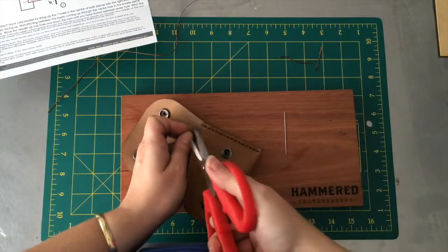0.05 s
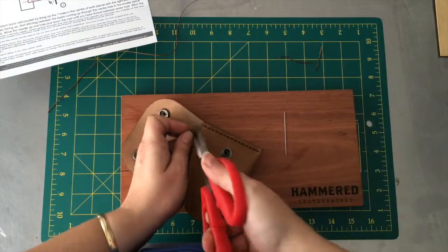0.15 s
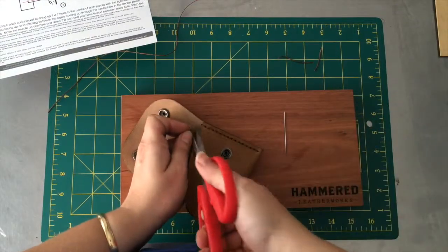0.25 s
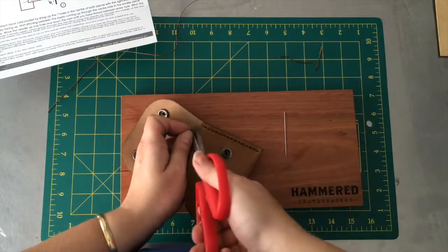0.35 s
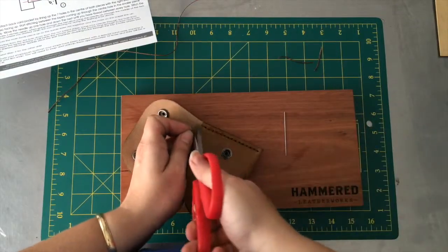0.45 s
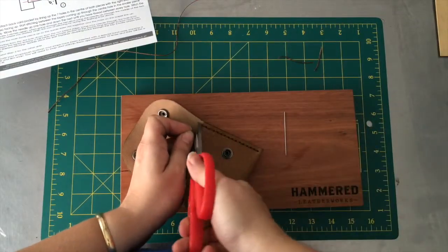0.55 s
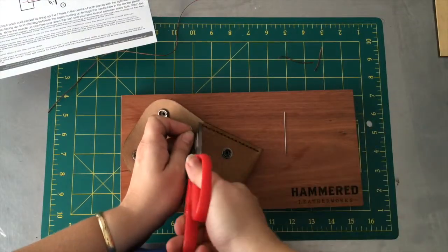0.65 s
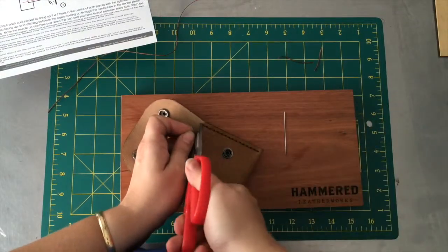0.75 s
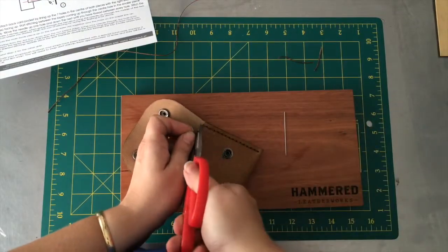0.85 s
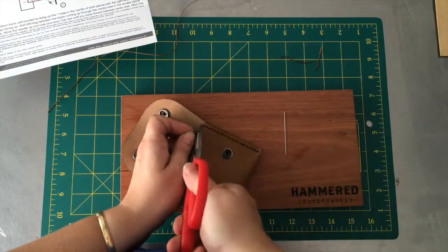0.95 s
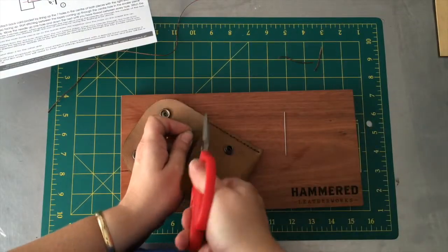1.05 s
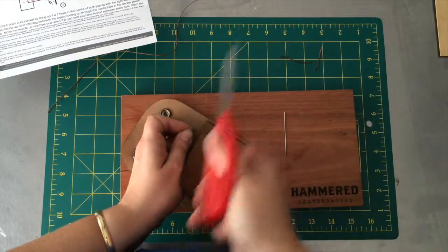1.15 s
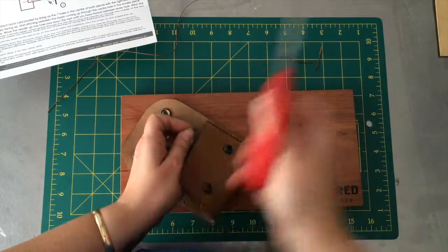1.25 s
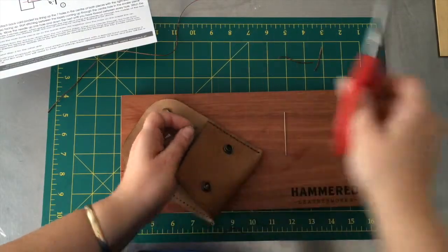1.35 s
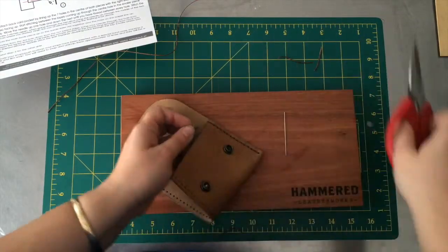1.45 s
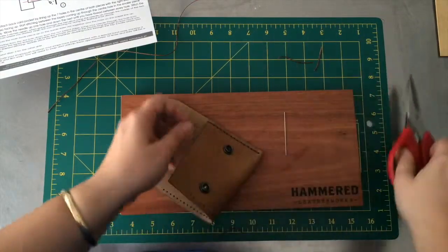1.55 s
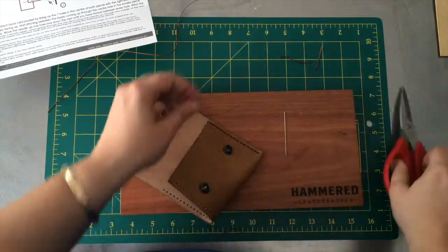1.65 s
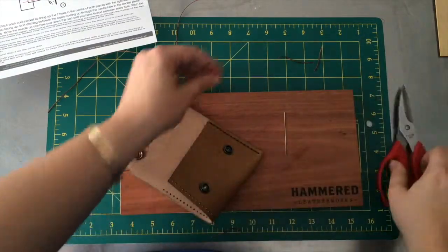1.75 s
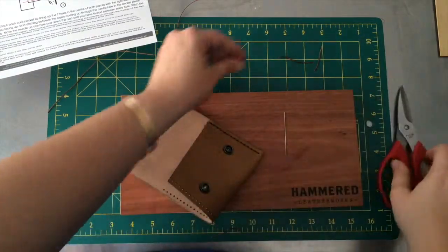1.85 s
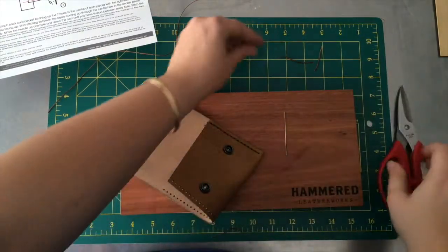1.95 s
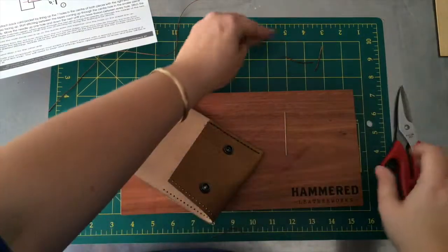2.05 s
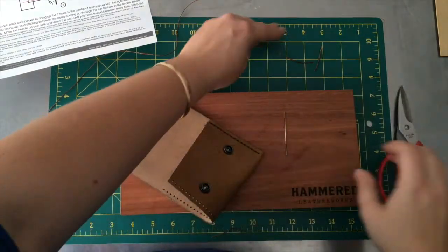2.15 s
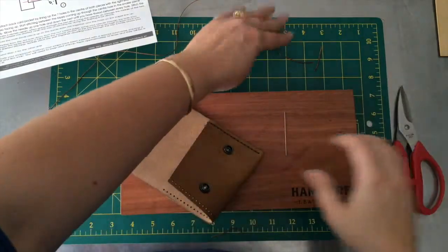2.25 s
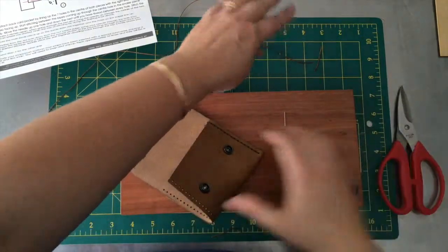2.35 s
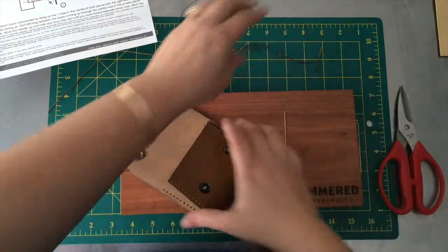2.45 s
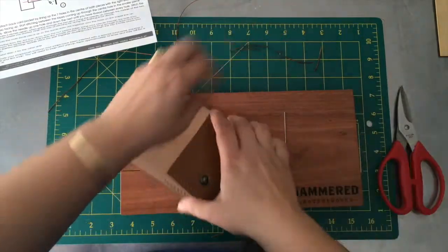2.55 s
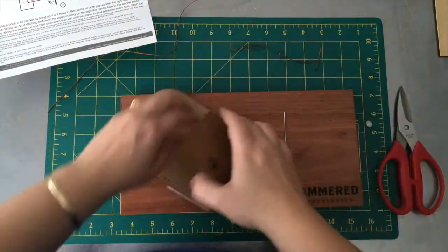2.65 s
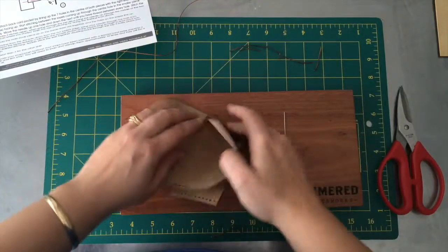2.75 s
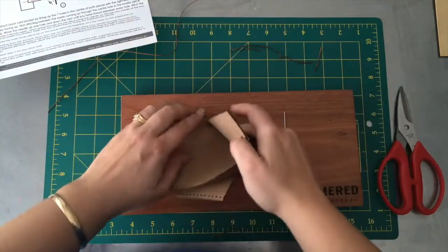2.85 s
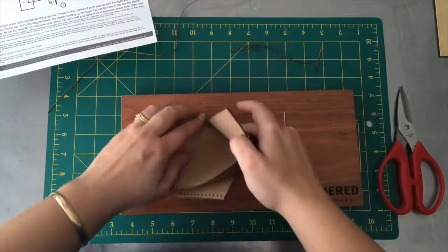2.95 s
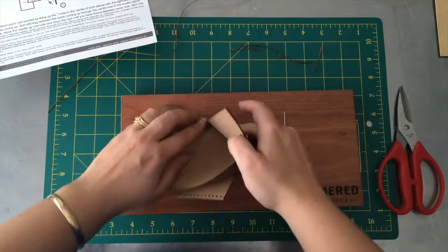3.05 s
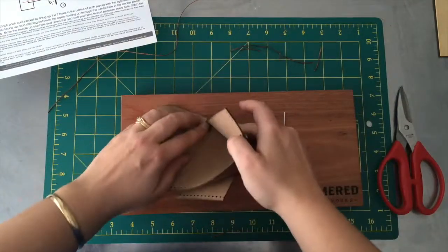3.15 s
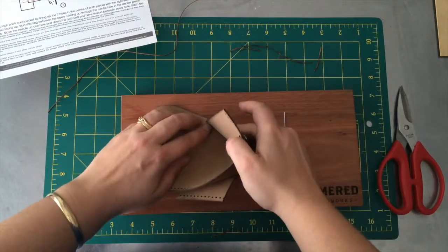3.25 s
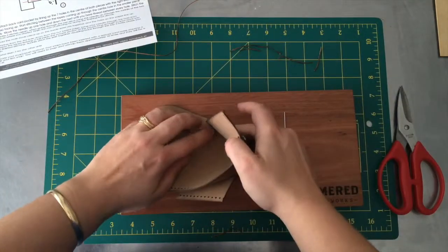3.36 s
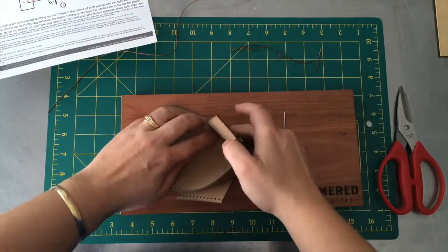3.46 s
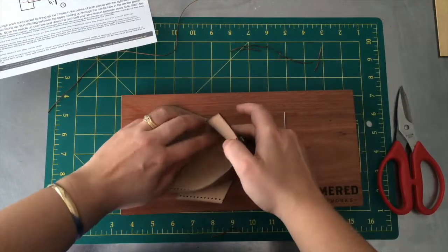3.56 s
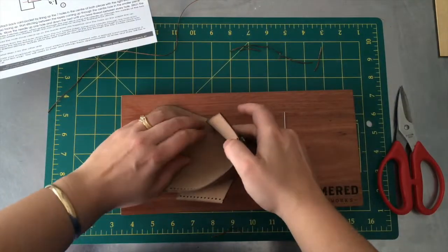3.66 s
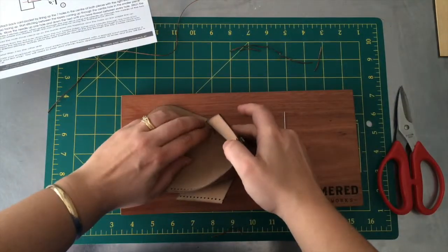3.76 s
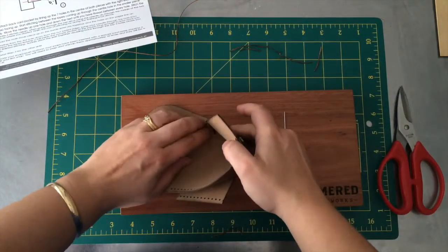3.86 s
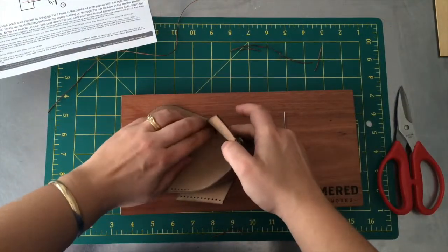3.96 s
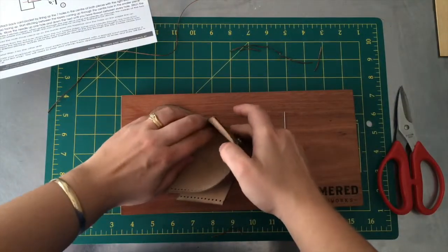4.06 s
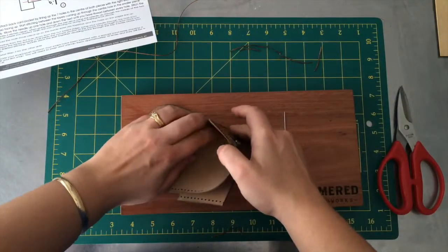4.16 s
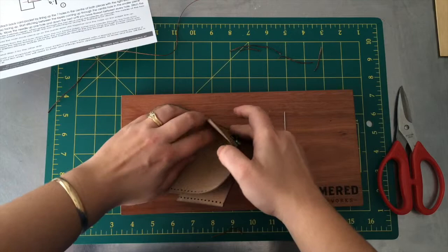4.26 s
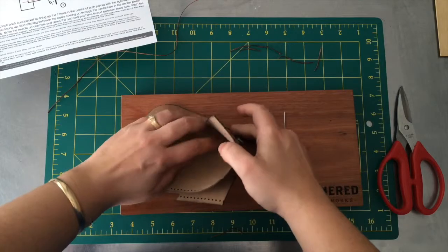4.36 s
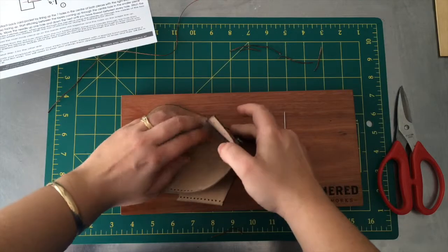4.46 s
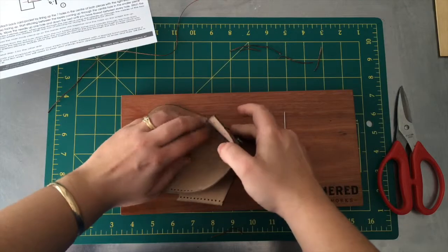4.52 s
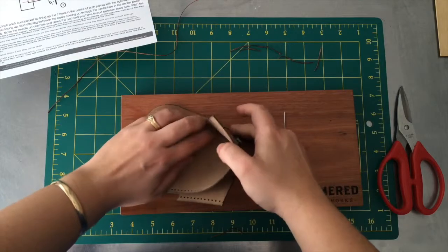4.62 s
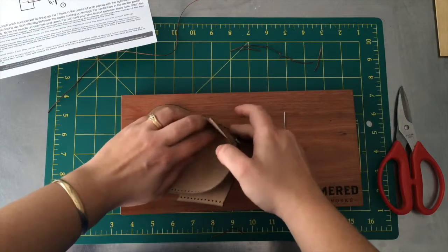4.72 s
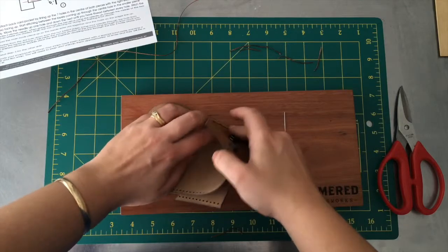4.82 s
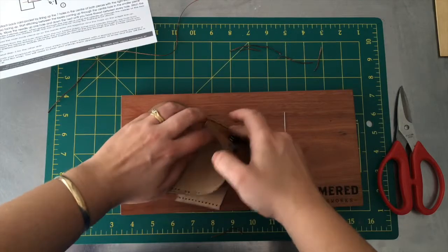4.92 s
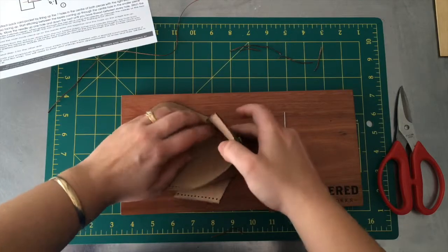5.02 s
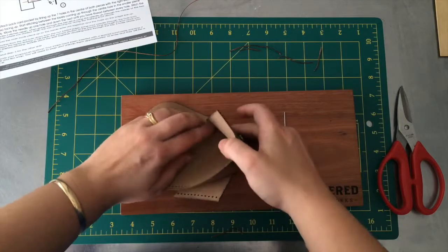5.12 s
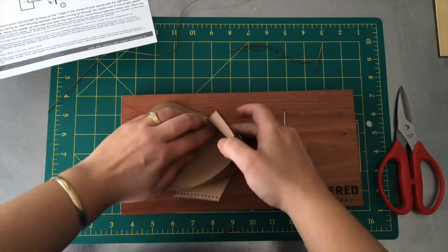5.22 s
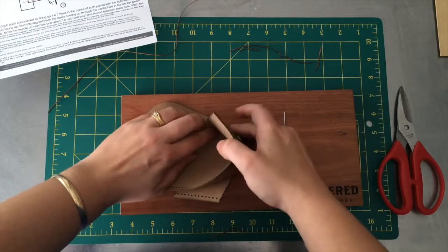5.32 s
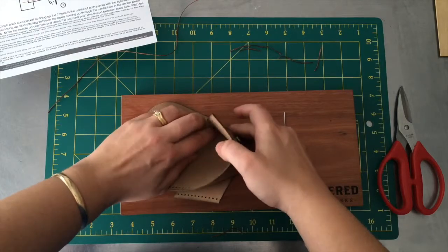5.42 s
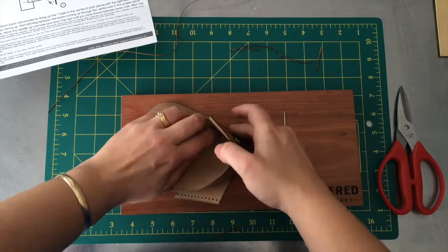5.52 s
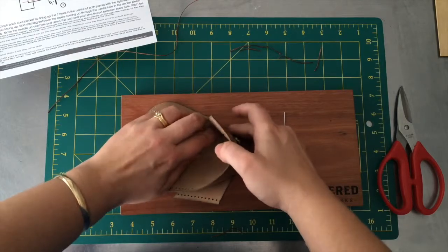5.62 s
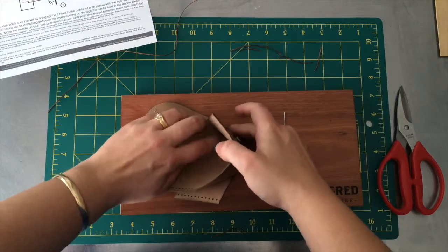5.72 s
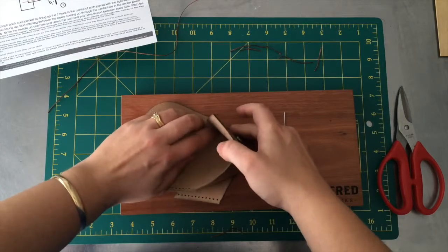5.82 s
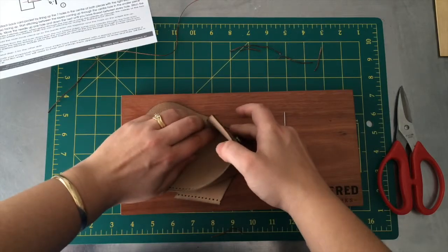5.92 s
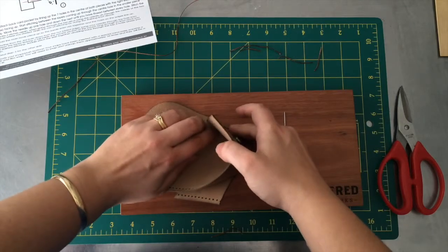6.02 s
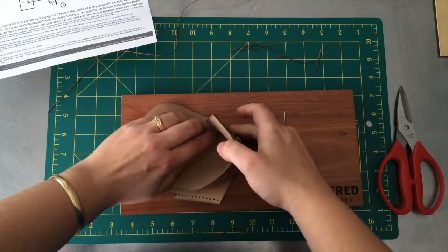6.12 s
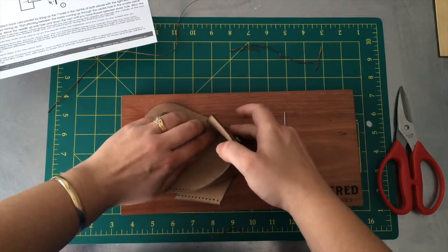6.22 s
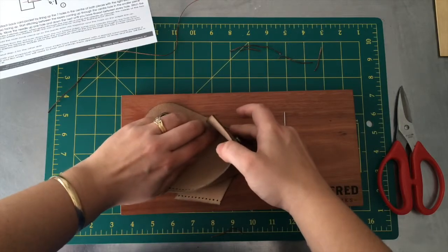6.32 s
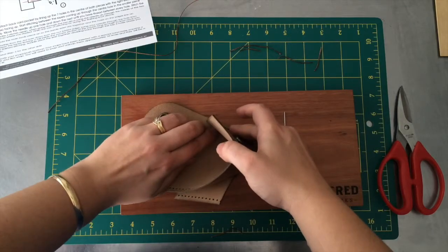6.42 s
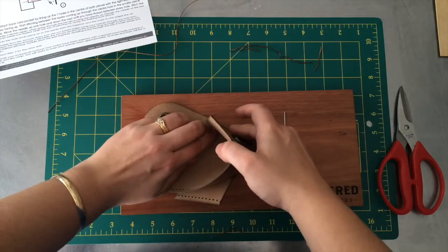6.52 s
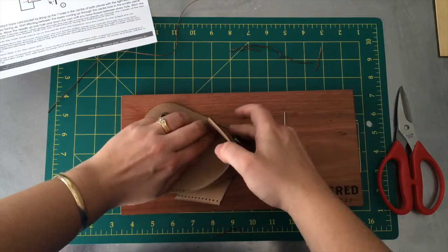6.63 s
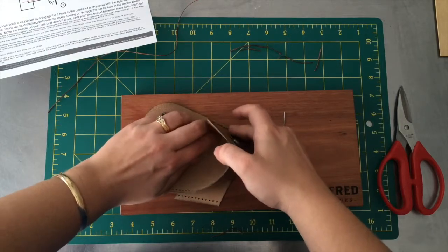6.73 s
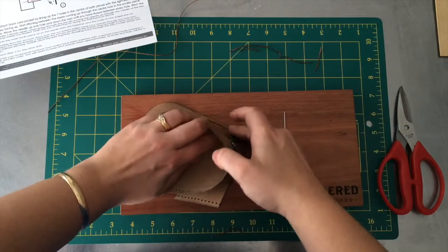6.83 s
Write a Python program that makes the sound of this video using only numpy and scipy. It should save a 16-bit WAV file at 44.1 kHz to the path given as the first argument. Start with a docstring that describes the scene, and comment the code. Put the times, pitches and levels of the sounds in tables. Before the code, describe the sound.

Scissors creak open faintly, snip a thread with one sharp bright cut, clatter down on a table, then leather is softly handled and rubbed.

```python
"""A soft rumble and hum with faint rubbing, then close by scissors creak open, snip a thread and are laid
down with a rattle on a work table. A leather pouch is handled and turned over, its stud tapping the board.
Hits are damped modes plus noise cracks, squeaks are narrow-band noise, and rubbing is noise made of grains.
A table-top mirror colours each direct hit, and a small room answers hits and rubbing."""
import sys
import numpy as np
from scipy import signal
from scipy.fft import rfft, irfft, next_fast_len
from scipy.io import wavfile
from scipy.ndimage import uniform_filter1d

SR = 44100
rng = np.random.default_rng(int(sys.argv[2]) if len(sys.argv) > 2 else 0)


def wrap_up_sound(samples):
    """Save the sound to the file named by the first command line argument, as 16-bit audio."""
    columns = np.atleast_2d(samples).T
    # keep every value between -1 and 1, then stretch to whole-number steps
    tamed = np.clip(columns, -1, 1)
    steps = np.round(tamed * 32767).astype(np.int16)
    wavfile.write(sys.argv[1], SR, steps)


def voltage_ratio(decibels):
    """Convert decibels (scalar or array-like) to amplitude ratios, 20 dB per decade."""
    exponent = np.asarray(decibels, float) / 20
    return 10 ** exponent


N = 303581  # length in samples


def evened(x):
    """Normalization: scales a signal to rms 1."""
    return x / np.sqrt(np.mean(x ** 2) + 1e-20)


def curve(rows):
    """Linear interpolation: each column of a timed table as a value for every sample."""
    s, *columns = np.transpose(rows)
    return [np.interp(np.arange(N) / SR, s, column) for column in columns]


def read(points, hz, order=1):
    """Interpolation on a logarithmic frequency axis: one column of a spectrum table at hz."""
    table = np.transpose(points)
    return np.interp(np.log(hz + 1), np.log(table[0] + 1), table[order])


def add(mix, s, sound):
    """Superposition: adds a sound into the mix at time s, in place."""
    part = mix[round(s * SR):][:len(sound)]
    part += sound[:len(part)]


def coloured(x, points):
    """Linear filtering: multiplies the spectrum by a table of dB against Hz; rms 1."""
    size = next_fast_len(N)
    gain = voltage_ratio(read(points, np.fft.rfftfreq(size, 1 / SR)))
    return evened(irfft(rfft(x, size) * gain, size)[:N])


def ring(modes, detune, contact_s):
    """Modal response to an impact: damped sines, slightly detuned each blow, softened by contact time; peak 1."""
    hz, width_hz, db = np.transpose(modes)[:, :, None]
    t = np.arange(9000) / SR
    chance = rng.uniform(-1.4, 1, (len(modes), 1))
    decay = np.exp(-np.pi * width_hz * t)  # a wide resonance dies quickly
    wave = np.sin(2 * np.pi * hz * (1 + detune * chance) * t)
    sound = (voltage_ratio(db) * width_hz * decay * wave).sum(0)
    sound = sound * (1 - np.exp(-t / contact_s))
    return sound / abs(sound).max()


def crack(low_hz, high_hz, decay_s):
    """Broadband contact transient: one impulse with a decaying gritty burst behind it; peak 1."""
    grit = 0.3  # size of the burst against the impulse, before filtering
    burst = grit * rng.standard_normal(1500) * np.exp(-np.arange(1500) / SR / decay_s)
    burst[0] = 1
    burst = signal.lfilter(*signal.butter(1, [low_hz, high_hz], "bandpass", fs=SR), burst)
    return burst / abs(burst).max()


def snip():
    """Modal impact: steel blades tick along the thread and cut it, ringing for milliseconds at each catch."""
    # Each row: start in seconds, peak of the ring in dB; the last row is the cut.
    catches = [(1.0666, -40), (1.0772, -42.5), (1.082, -46.5), (1.0877, -36), (1.0892, -6)]
    # Resonances of the blades. Each row: frequency in Hz, width in Hz, relative spectral height in dB.
    blades = [(759, 110, -11), (1000, 130, -8), (2340, 450, -5.5), (3300, 450, -7.5), (4500, 900, -16.5),
              (5560, 10, -5), (7570, 60, -6.5), (7120, 1700, -2.5), (8770, 1800, 5), (9930, 900, -1.5),
              (11100, 1100, -4.5), (12995, 3600, -15)]
    out = np.zeros(N)
    for s, db in catches:
        add(out, s, voltage_ratio(db) * ring(blades, detune=0.0083, contact_s=0.0004))
        add(out, s, voltage_ratio(db - 5) * crack(low_hz=3780, high_hz=10980, decay_s=0.002))
    return out


def pivot():
    """Stick-slip friction: the opening pivot slips in uneven clicks that ring the handles."""
    # Each row: start in seconds, peak of the ring in dB, pitch in Hz, peak of the crack in dB.
    slips = [(0.188, -44, 1170, -49.5), (0.193, -39, 1290, -58), (.197, -34.5, 1470, -53),
             (0.203, -35, 1520, -50.5), (0.2162, -39, 1490, -41.5), (0.222, -39.5, 1340, -49),
             (0.2315, -29, 1300, -48.5), (0.2333, -31, 1305, -39.5), (0.237, -35.5, 1290, -37),
             (0.247, -30.5, 1310, -38.5), (.254, -38.5, 735, -38.5), (.277, -50, 1300, -62),
             (0.315, -46.5, 1300, -54), (.325, -49.5, 1280, -57)]
    # Handle resonances. Each row: multiple of the pitch, width in Hz, relative spectral height in dB.
    partials = [(0.549, 150, 2), (1, 170, 10.5), (1.7, 324, -2.5)]
    out = np.zeros(N)
    for s, db, hz, crack_db in slips:
        modes = [(multiple * hz, width_hz, mode_db) for multiple, width_hz, mode_db in partials]
        add(out, s, voltage_ratio(db) * ring(modes, detune=0.01, contact_s=0.0003))
        add(out, s, voltage_ratio(crack_db) * crack(low_hz=2000, high_hz=6300, decay_s=0.0027))
    return out


def squeak():
    """Sliding friction: steel drags on steel at the pivot, a faint whistle of narrow-band noise."""
    # Each row: middle in seconds, length in seconds, rms in dB before the swell, pitch in Hz.
    slides = [(0.447, .05, -71, 1336), (0.582, 0.092, -66.5, 1304), (1.555, .09, -77, 1700)]
    width_hz = 100
    r = np.exp(-np.pi * width_hz / SR)
    out = np.zeros(N)
    for s, length_s, db, hz in slides:
        t = np.arange(round(length_s * SR)) / SR
        a, b = rng.standard_normal((2, len(t)))
        waver = signal.lfilter([1 - r], [1, -r], a + 1j * b)
        whistle = (waver * np.exp(2j * np.pi * hz * t)).real
        swell = signal.windows.tukey(len(t), 0.6)
        add(out, s - len(t) / SR / 2, voltage_ratio(db) * evened(whistle) * swell)
    return out


def laid_down():
    """Coupled impact: scissors land and rock; the table booms, plastic handles clack and steel cracks."""
    # Each row: start in seconds, then before the high-pass the peak of the boom in dB and of the handle
    # in dB, handle pitch in Hz, peak of the crack in dB.
    knocks = [(1.698, -44, -56, 1190, -58.5), (1.710, -15.5, -17, 1236, -10.5),
              (1.7275, -27.5, -16.5, 681, -26), (1.771, -27.5, -28, 880, -37.5),
              (1.7764, -13, -19.5, 1000, -26.5), (1.782, -35.5, -30, 1280, -33.5),
              (1.787, -34.5, -29, 1280, -38.5), (1.863, -44.5, -49, 1040, -67),
              (1.935, -34.5, -38, 1190, -36.5)]
    # Table-top resonances. Each row: frequency in Hz, width in Hz, relative spectral height in dB.
    table_modes = [(203, 81, -5), (285.6, 72, -0.5), (380, 55, 2), (475.5, 69, -4.5), (560, 51, -10)]
    out = np.zeros(N)
    for s, boom_db, handle_db, hz, crack_db in knocks:
        handle = [(hz, 200, 0), (1.3 * hz, 200, -4), (1.93 * hz, 300, -3), (3.2 * hz, 700, -11)]
        add(out, s, voltage_ratio(boom_db) * ring(table_modes, detune=0.0076, contact_s=0.002))
        add(out, s, voltage_ratio(handle_db) * ring(handle, detune=0.01, contact_s=0.00033))
        add(out, s, voltage_ratio(crack_db) * crack(low_hz=1800, high_hz=6100, decay_s=0.00092))
    # a small table radiates little below its lowest mode
    return signal.lfilter(*signal.butter(2, 80, "highpass", fs=SR), out)


def stud():
    """Modal impact: a small metal stud scrapes, then taps the wooden board."""
    # Each row: start in seconds, peak in dB.
    taps = [(2.735, -51), (2.744, -51), (2.749, -52.5), (2.756, -15)]
    # Resonances of stud on board. Each row: frequency in Hz, width in Hz, relative spectral height in dB.
    stud_modes = [(999, 44, 1.5), (2210, 760, 2), (1885, 12, 7), (3360, 1100, 9.5), (3950, 62, -7),
                  (4650, 2300, 8), (8100, 240, -10.5), (12000, 1400, -7)]
    out = np.zeros(N)
    for s, db in taps:
        add(out, s, voltage_ratio(db) * ring(stud_modes, detune=0.01, contact_s=0.0003))
    return out


def ticks():
    """Sudden release of strain: stiff leather and stitches click under the fingers and push the board."""
    # Each row: start in seconds, peak of the ring in dB, pitch in Hz, crack in dB relative to the ring.
    clicks = [(0.844, -61.5, 2140, 2), (0.911, -55, 1590, -17), (1.164, -32.5, 3000, -17.5),
              (2.033, -47, 1083, -6), (2.168, -51.5, 1090, -16), (2.642, -54, 1680, -1),
              (3.177, -43, 1970, -6.5), (3.279, -54.5, 2050, -21), (3.399, -67, 3000, 1),
              (3.414, -40.5, 1280, -12), (3.603, -55.5, 1637, -0.5), (3.91, -49, 1650, -26),
              (4.265, -61.5, 1490, 4), (4.317, -54.5, 1860, -6), (4.908, -51, 1112, 1),
              (5.235, -58.5, 1110, -19.5), (5.393, -61, 1580, 5.5), (5.594, -56.5, 1144, -20.5),
              (5.654, -46, 1330, -9), (5.907, -55, 1838, -29), (6.21, -49.5, 1975, -13),
              (6.287, -60.5, 1260, -15), (6.576, -60.5, 1660, -15.5)]
    out = np.zeros(N)
    for s, db, hz, treble_db in clicks:
        # deeper clicks push the board harder: -5.5 dB at 1 kHz, -17 dB per octave upwards
        thump_db = -5.5 - 17 * np.log2(hz / 1000)
        leather = [(hz, 400, 0), (0.62 * hz, 400, -5), (1.3 * hz, 600, -5), (1.4 * hz, 900, -9)]
        board = [(89.7, 150, -6), (174, 110, 3.5)]
        add(out, s, voltage_ratio(db) * ring(leather, detune=0.02, contact_s=0.00057))
        add(out, s, voltage_ratio(db + treble_db) * crack(low_hz=3000, high_hz=10900, decay_s=0.0014))
        add(out, s, voltage_ratio(db + thump_db) * ring(board, detune=0.056, contact_s=0.0022))
    return out


def rubbing():
    """Granular friction: tiny catches of skin on grain come in clumps, ring the leather and hiss."""
    # Hands resting and shifting on the leather. Each row: time in seconds, body level in dB.
    resting = [(0.0, -71), (0.428, -68), (0.832, -71), (1.05, -75), (1.4, -75.5), (1.69, -86), (2.0, -71),
               (2.094, -67.5), (2.382, -75.5), (2.95, -77.5), (4.0, -76), (4.26, -78), (4.6, -88),
               (4.85, -73.5), (5.24, -75.5), (5.6, -83.5), (5.8, -78), (6.13, -78), (6.3, -82.5),
               (6.88, -83.5)]
    # Quick single strokes. Each row: middle in seconds, length in seconds, body added in dB, hiss added in dB.
    strokes = [(1.557, 0.11, -85, -80), (2.227, 0.056, -84.5, -75.5), (2.598, 0.081, -61, -67.5),
               (2.641, 0.051, -59.5, -69), (2.748, 0.048, -61, -62), (2.777, 0.083, -66, -62),
               (2.856, 0.26, -67.5, -69.5), (3.622, 0.14, -86, -87), (4.129, 0.1, -71.5, -79.5),
               (4.345, 0.026, -72, -73.5), (4.37, 0.099, -70.5, -78.5), (4.498, 0.018, -85, -85),
               (4.679, 0.12, -73.5, -86.5), (4.876, 0.059, -75, -85.5), (4.915, 0.055, -70.5, -72.5),
               (5.007, 0.019, -80.5, -68), (5.034, 0.06, -69.5, -77), (5.743, 0.062, -65, -71),
               (5.848, 0.1, -75.5, -89.5), (6.136, 0.076, -70, -80.5), (6.833, 0.19, -78.5, -88.5)]
    # Spectrum of the leather body. Each row: frequency in Hz, relative density in dB per Hz.
    leather = [(500, -33), (850, -8), (1150, -0.5), (1300, 0.5), (1500, 1.5), (1780, 2.5), (2050, -1),
               (2600, -13.5), (3050, -9.5), (3500, -17.5), (4500, -24.5), (6500, -44)]
    # Spectrum of the hiss. Each row: frequency in Hz, relative density in dB per Hz.
    hiss_spectrum = [(1470, -35.5), (2500, -3), (4680, -1), (5570, -1.5), (6850, -3), (14100, -8),
                     (15500, -16)]
    grains_per_s, grain_spread_db = 5000, -2.1

    level_db, = curve(resting)
    body = voltage_ratio(level_db)
    # hiss is -86.5 dB at a body level of -77 dB and follows 0.88 of each change
    hiss = voltage_ratio(-86.5 + 0.88 * (level_db + 77))
    for s, length_s, body_db, hiss_db in strokes:
        swell = signal.windows.tukey(round(length_s * SR), 0.8)
        start_s = s - len(swell) / SR / 2
        add(body, start_s, voltage_ratio(body_db) * swell)
        add(hiss, start_s, voltage_ratio(hiss_db) * swell)

    # noise smoothed twice makes neighbouring grains strong or weak together
    clumps = uniform_filter1d(rng.standard_normal(N), size=300)
    clumps = evened(uniform_filter1d(clumps, size=300))
    sizes = voltage_ratio(grain_spread_db * np.minimum(rng.exponential(1, N), 3) + 2 * clumps)
    present = rng.random(N) < grains_per_s / SR
    grains = evened(rng.standard_normal(N) * sizes * present)
    grains = grains + 0.4 * rng.standard_normal(N)
    return body * coloured(grains, leather) + hiss * coloured(grains, hiss_spectrum)


def background():
    """Stationary and modulated noise: low rumble, a fuzzy wavering hum and the steady air of the room."""
    # Each row: time in seconds, rumble level in dB, hum gain in dB.
    levels = [(0.0, -69, -66.5), (0.978, -67, -68.5), (1.332, -69.5, -75), (1.6, -68, -93.5),
              (2.05, -66, -69), (2.45, -71.5, -78.5), (2.75, -70.5, -73.5), (2.94, -72, -71),
              (3.19, -72.5, -77), (3.5, -70, -75), (4.2, -76, -73.5), (4.5, -76, -92.5), (4.98, -66, -71),
              (5.13, -70.5, -77.5), (5.26, -63, -76.5), (5.55, -74, -85.5), (5.91, -64.5, -75.5),
              (6.03, -63, -75), (6.21, -74, -78.5), (6.88, -71.5, -76)]
    # Bands of the hum. Each row: multiple of the hum frequency, width in Hz, rms in dB before the hum gain.
    hum_orders = [(1, 34.94, 0.5), (1.95, 107.2, -6.5)]
    # Spectrum of the rumble. Each row: frequency in Hz, relative density in dB per Hz.
    rumble_spectrum = [(15, -40.5), (25, -13), (37, -1), (86, 0.5), (167, -9), (194, -4.5), (223, -24.5),
                       (270, -16), (320, -11.5), (420, -43), (700, -120)]
    # Spectrum of the air. Each row: frequency in Hz, relative density in dB per Hz.
    air_spectrum = [(120, -12), (200, -1), (310, -16.5), (618, -12.5), (742, -16), (1090, -26.5),
                    (2020, -26.5), (2750, -25.5), (3070, -27.5), (15500, -32)]
    hum_hz, air_db = 365, -74

    rumble_db, hum_db = curve(levels)
    turns = hum_hz * np.arange(N) / SR
    hum = np.zeros(N)
    for multiple, width_hz, db in hum_orders:
        r = np.exp(-np.pi * width_hz / SR)
        noise = rng.standard_normal(N) + 1j * rng.standard_normal(N)
        waver = signal.lfilter([1 - r], [1, -r], noise)
        hum += voltage_ratio(db) * evened((waver * np.exp(2j * np.pi * multiple * turns)).real)
    rumble = coloured(rng.standard_normal(N), rumble_spectrum)
    air = coloured(rng.standard_normal(N), air_spectrum)
    return voltage_ratio(rumble_db) * rumble + voltage_ratio(hum_db) * hum + voltage_ratio(air_db) * air


def bounce(x, delay_s, db):
    """Image source: the table top mirrors a source held above it, a comb on the direct sound only."""
    lag = round(delay_s * SR)
    return x + voltage_ratio(db) * np.concatenate([np.zeros(lag), x[:N - lag]])


def room(x):
    """Reverberation: near echoes and sparse random taps whose bands decay at their own speed."""
    # Each row: frequency in Hz, time to fall 60 dB in seconds, relative starting level in dB.
    decays = [(150, 0.43, -7.5), (500, 0.19, 0.5), (1501, 0.28, 1.5), (4000, 0.26, -0.5), (8000, 0.29, -1),
              (14000, 0.073, 6.5)]
    # Nearest surfaces. Each row: delay in seconds, level in dB.
    echoes = [(.0045, -11), (.009, -12.5), (.012, -17.5), (.016, -20)]
    impulses = np.zeros(SR // 2)
    at = np.arange(320, len(impulses) - 12, 12)
    impulses[at + rng.integers(0, 12, len(at))] = rng.choice([-1., 1.], len(at))
    hz, t, z = signal.stft(impulses, SR, nperseg=256)
    t60 = read(decays, hz)[:, None]
    start_db = read(decays, hz, order=2)[:, None]
    tail = signal.istft(z * voltage_ratio(start_db - 60 * t / t60), SR, nperseg=256)[1]
    tail *= voltage_ratio(-2) / np.linalg.norm(tail)
    for s, db in echoes:
        add(tail, s, voltage_ratio(np.array([db])))
    return signal.oaconvolve(x, tail)[:N]


def scene():
    """Superposition of direct and reverberant sound: each hit has its own mirror and share of the room."""
    # Each row: sound, mirror delay in seconds, mirror level in dB, room send in dB.
    hits = [(snip(), 0.00092, -4, 0.1), (pivot(), 0.00092, -5, -9), (laid_down(), 0.00088, -9, -3),
            (stud(), 0.00097, -3, -7), (ticks(), 0.0009, -8, -4)]
    rubs = rubbing() + squeak()
    direct = rubs + sum(bounce(x, delay_s, db) for x, delay_s, db, _ in hits)
    sent = voltage_ratio(-10.5) * rubs + sum(voltage_ratio(room_db) * x for x, _, _, room_db in hits)
    return (direct + room(sent) + background())[None]


def band_limit(x):
    """A steep low-pass at the top of the band."""
    return signal.sosfilt(signal.butter(12, 16480, fs=SR, output="sos"), x)


def record(dry):
    """Band limiting: the microphone loses the deepest bass and a steep low-pass ends the treble."""
    low_hz, edge_hz = 43, 16300
    thinned = signal.lfilter(*signal.butter(2, low_hz, "highpass", fs=SR), dry)
    edge = signal.firwin(255, edge_hz, window=("kaiser", 9), fs=SR)
    mix = signal.oaconvolve(thinned, edge[None], "same")
    return band_limit(mix)


dry = scene()
out = record(dry)
wrap_up_sound(out)
```